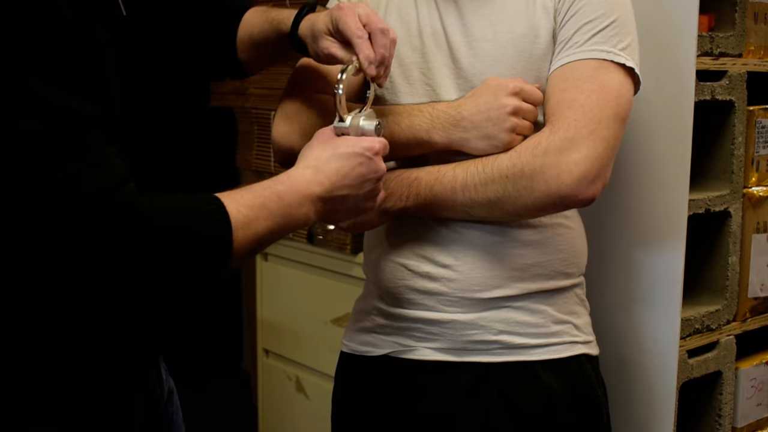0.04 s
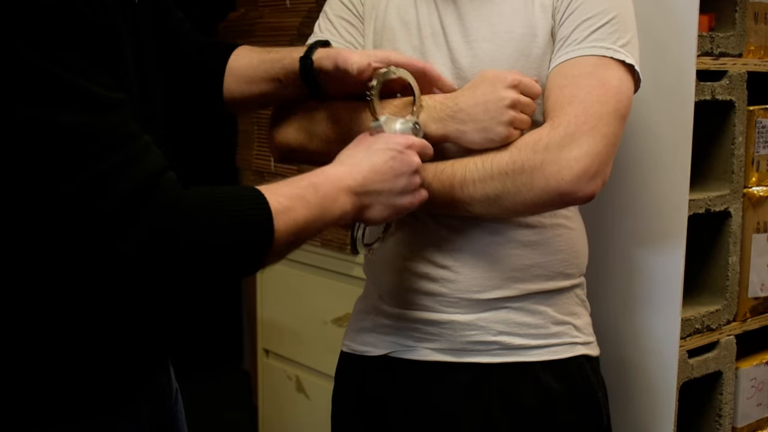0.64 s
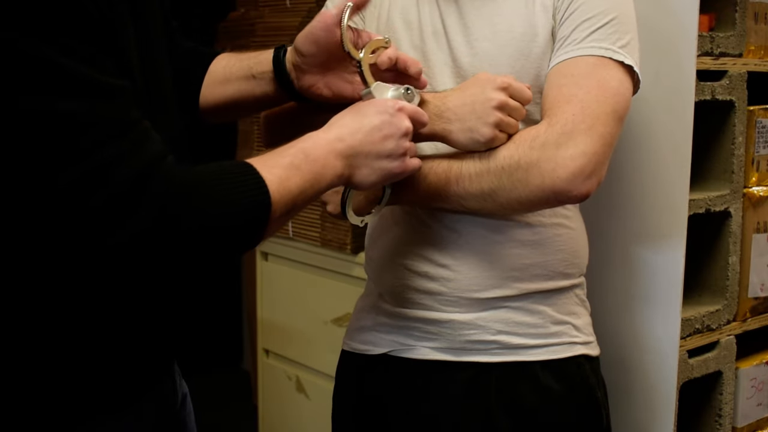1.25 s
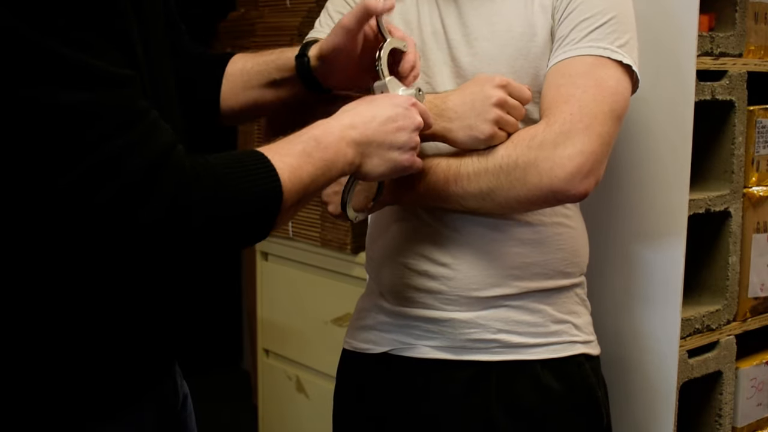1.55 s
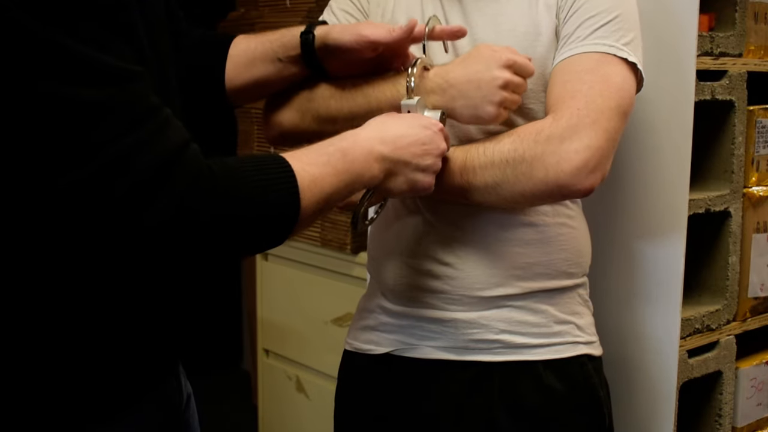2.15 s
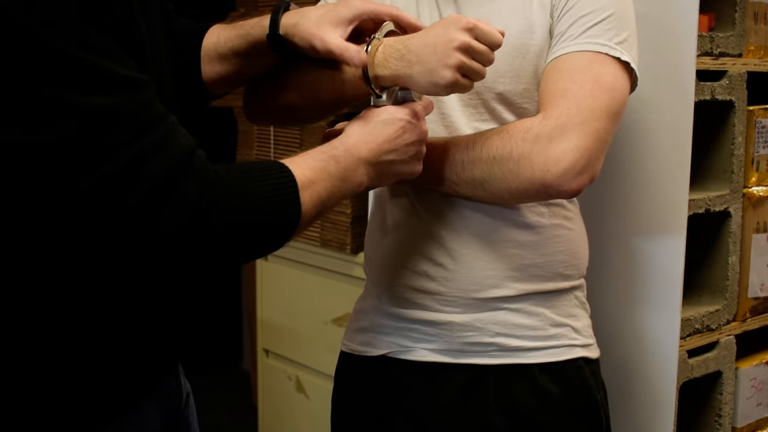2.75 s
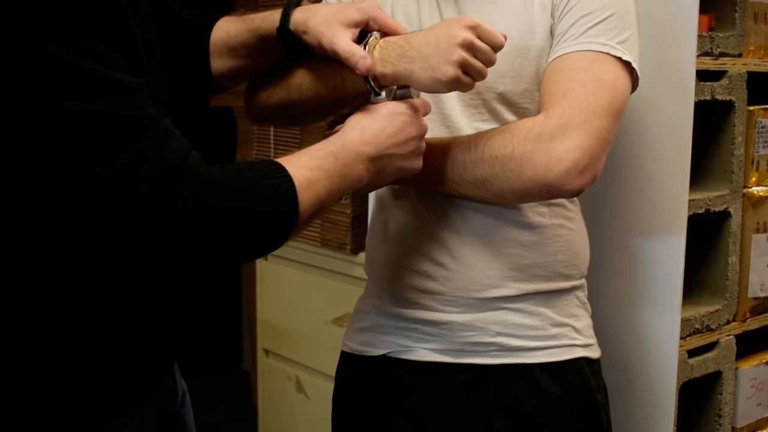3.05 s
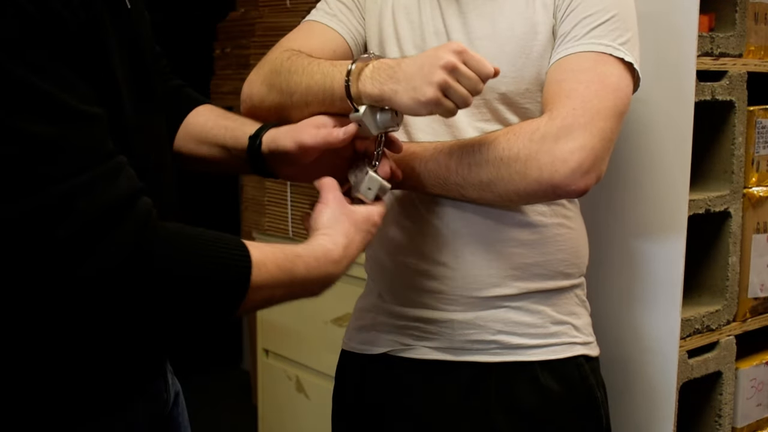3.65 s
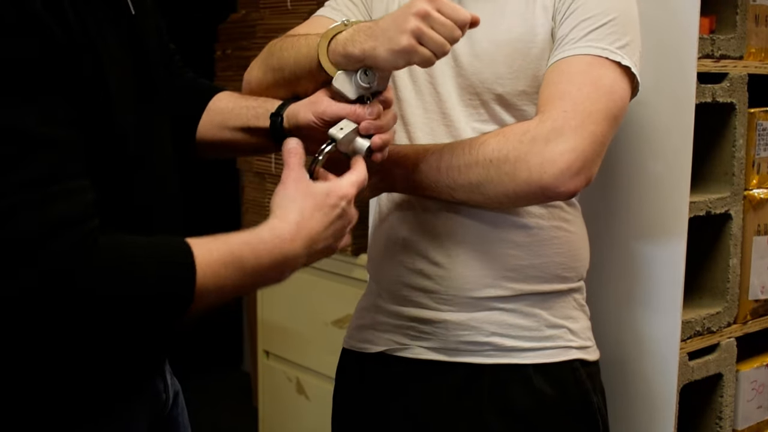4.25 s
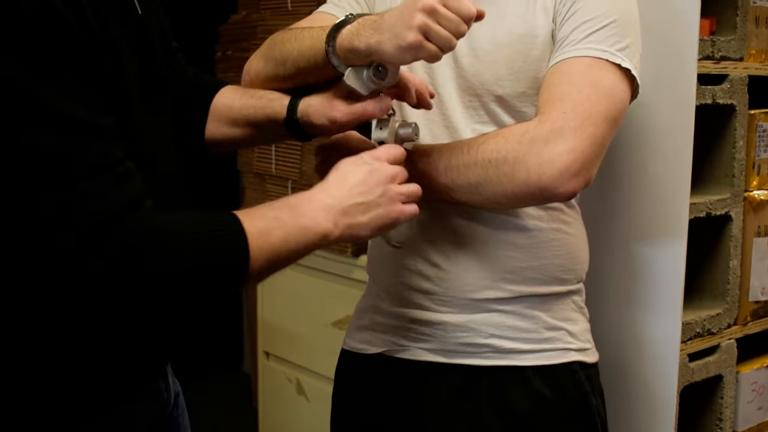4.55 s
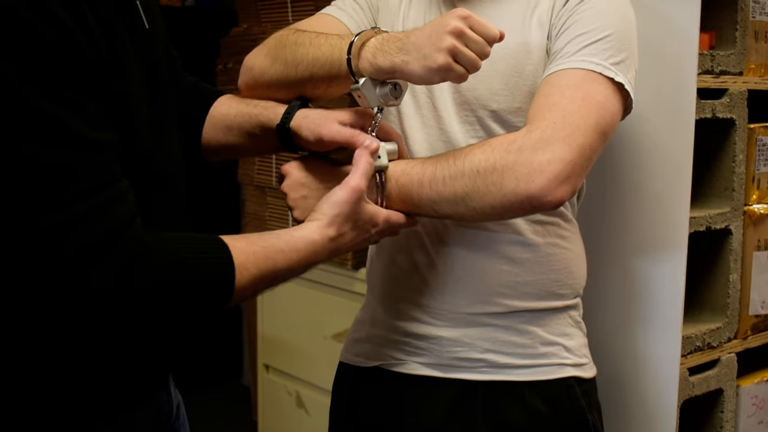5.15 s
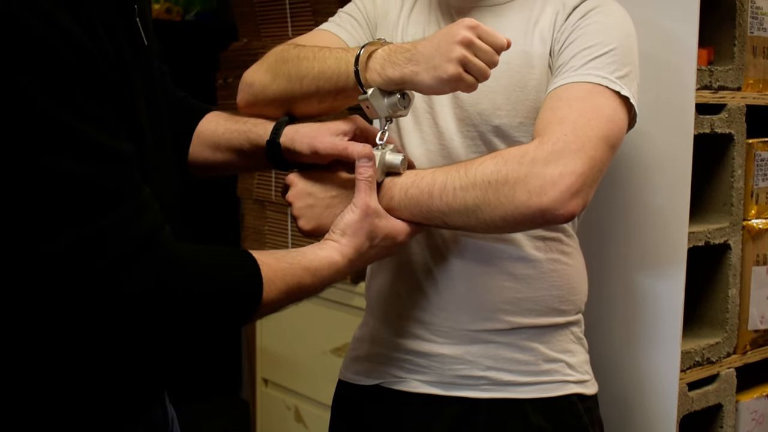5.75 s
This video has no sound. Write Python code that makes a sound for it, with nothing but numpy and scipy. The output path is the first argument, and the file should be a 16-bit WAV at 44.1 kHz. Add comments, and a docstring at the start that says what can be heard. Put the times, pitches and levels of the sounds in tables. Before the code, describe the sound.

Steel handcuffs clink and scrape, then ratchet shut in short, loud zips close by, over a faint electric room hum.

```python
"""Faint chain clinks come first, then loud zips as steel handcuffs close on a man's wrists.
Each zip is a small catch (the pawl) snapping over a row of teeth, loud enough to distort.
In between, links and curved cuff arms clink and scrape, and the open cuff rings on its chain.
A cuff knocks dully on the wrist, and sleeves and skin rustle. It all sounds close by,
in a small cluttered room with a faint electric hum."""
import sys
import numpy as np
from scipy import signal
from scipy.fft import rfft, irfft
from scipy.io import wavfile
from scipy.ndimage import uniform_filter1d, minimum_filter1d

SR = 44100
rng = np.random.default_rng(int(sys.argv[2]) if len(sys.argv) > 2 else 0)


def digitize_waveform(pressure):
    """Quantize a signal to 16-bit integers and store it at the path in sys.argv[1].

    Rows of a 2-D input are taken as channels; values are limited to [-1, 1].
    """
    field = np.atleast_2d(pressure).T
    bounded = np.clip(field, -1, 1)
    quanta = np.round(bounded * 32767).astype(np.int16)
    wavfile.write(sys.argv[1], SR, quanta)


N = 264644  # samples, about 6 seconds

# Pushes of the cuff arm through the ratchet. Pitch, body and edge are explained in steel_hit.
# start_s, length_s, tooth_count, level_db, level_change_db, pitch_hz, body_db, edge_db
RATCHET_RUNS = [(0.9201, 0.017, 6, -5, -2.5, 8840, -16, -9), (0.9918, 0, 1, -8.5, 0, 9000, -15.5, -14.5),
                (1.027, 0.022, 8, -5, 0.5, 8830, -14.5, -12.5), (2.7911, 0.018, 3, -6, -0.5, 8060, -9, -2),
                (2.8202, 0.011, 2, -22, 4.5, 9600, -11, -5), (2.908, 0.035, 9, -6.5, -1.5, 7400, -8, -1.5),
                (3.8882, 0.014, 8, -4, -7, 8040, -10.5, -5.5), (3.9343, .0072, 2, -7, -6, 7500, -9, -5),
                (5.7967, 0.0087, 2, -10, 5, 10460, -11.5, -5.5),
                (5.8357, 0.022, 6, -6, -1.5, 6370, -9.5, -2), (5.9401, 0, 1, -7.5, 0, 6880, -8.5, -3.5)]


def ratchet(pitch_spread=.08, push_curve=.87):
    """The pawl snaps over each tooth; the hand around the cuff stops the ring almost at once."""
    out = np.zeros(N)
    for start_s, length_s, teeth, db, change_db, hz, body_db, edge_db in RATCHET_RUNS:
        for progress in np.linspace(0, 1, teeth):
            pitch_hz = hz * (1 + pitch_spread * rng.standard_normal())
            snap = steel_hit(pitch_hz, body_db, edge_db, fade_s=.012, ring_db=-36, crack_db=-1)
            delay_s = length_s * progress ** push_curve  # a power under 1 makes the arm speed up
            add(out, start_s + delay_s, undb(db + change_db * progress) * snap)
    return out


# The tones a cuff rings with when struck: pitch_hz, level_db
STEEL_TONES = [(2090, -13.5), (2550, -2), (3060, 2), (3400, 0.5), (3860, 1.5), (4200, 2), (4480, -10),
               (4790, 1), (5430, -2.5), (5690, -1.5), (6200, 1), (6560, -1), (6900, 1.5), (7700, -7),
               (8000, 3.5), (8440, 0), (8710, -1.5), (9100, 1.5), (9670, 2.5), (10120, 0.5), (10500, 2),
               (10880, 2.5), (12080, 6), (12500, 1.5), (13050, -0.5), (13600, -3), (14200, -10)]
# The tone colour of the noisy crack of steel on steel: pitch_hz, level_db
CRACK_COLOUR = [(100, -30), (500, -19), (1200, 0.5), (2300, 6), (4000, -1), (8000, 2), (11000, -1),
                (13200, 3), (14500, -5), (16000, -4)]


def steel_hit(pitch_hz, body_db, edge_db, fade_s, ring_db, crack_db=-3, boost_db=10, samples=7000):
    """Steel hits steel: a crack, tones cut short by the grip, and a faint longer ring."""
    t = np.arange(samples) / SR
    # Body sets the low treble and edge the very high treble; the middle stays the same.
    colour = [(2000, min(2 * body_db + 3.5, body_db + 2)), (2900, body_db), (4000, body_db),
              (5000, -4), (8000, -3.5),
              (10500, .44 * edge_db - .5), (12600, edge_db), (16000, .47 * edge_db - 7)]

    def contact_gain(hz):
        """The spot that is struck favours the tones near pitch_hz."""
        nearness = np.exp(-((hz - pitch_hz) / 480) ** 2)
        return gain_at(hz, colour) * undb(boost_db * nearness)

    # The grip makes each tone a little different in pitch and strength at every hit.
    hz, db = np.transpose(STEEL_TONES)
    level_shift, pitch_shift, phase = rng.standard_normal((len(hz), 3)).T
    hz = hz * (1 + .01 * pitch_shift)
    gains = undb(db + 3.5 * level_shift) * contact_gain(hz)
    waves = np.sin(2 * np.pi * (np.outer(hz, t) + phase[:, None]))
    tones = gains @ waves / np.sqrt(np.sum(gains ** 2) / 2)
    crack = undb(crack_db) * noise(samples, lambda f: gain_at(f, CRACK_COLOUR) * contact_gain(f))
    ring = undb(ring_db) * tones * fade(t, .067)
    hit = (tones + crack) * fade(t, fade_s) + ring
    return hit / np.sqrt(np.mean(hit[:110] ** 2))  # the first 2.5 ms set the strength


# Links and cuff arms touching: start_s, level_db, pitch_hz, body_db, bounce_after_s (0 for none)
CHAIN_CLINKS = [(0.0397, -43, 4860, 21, 0), (0.0866, -44.5, 7060, 3, 0.016),
                (0.6982, -35, 5560, -4.5, 0.017), (1.0, -22, 9000, -10, .01),
                (1.1264, -28.5, 10870, -4, 0.0039), (1.1771, -37, 5430, 5, .004),
                (1.2336, -34, 5530, -18.5, 0), (1.2481, -31, 8800, -7.5, 0.00027),
                (1.4617, -34.5, 5400, -11.5, .0026), (1.5489, -28.5, 6200, -13, 0.017),
                (2.2685, -44, 6400, 2, 0.0088), (2.5332, -27, 7410, -3, 0),
                (2.5455, -21.5, 6693, -6, 0.025), (2.5981, -31, 4777, -1.5, 0.0013),
                (2.7324, -34.5, 5035, 12.5, 0.0007), (3.0854, -33, 7600, -4, 0.01),
                (3.3445, -42.5, 7010, 3.5, 0), (3.3995, -30.5, 7100, -6.5, 0.0033),
                (3.547, -37.5, 4700, -3, 0.0046), (3.58, -30.5, 5733, -0.5, 0),
                (3.6039, -28.5, 6900, -4.5, 0.0022), (3.6785, -23, 6180, -11, 0),
                (3.7256, -33.5, 10000, 4.5, 0.0011), (3.7674, -34.5, 7410, -4, 0.0043),
                (4.0769, -39, 6510, 7, 0), (4.15, -25.5, 9370, -3, 0.0016), (4.2604, -33, 7300, -1, 0),
                (4.3203, -31.5, 6400, -2.5, 0.00084), (4.3442, -20, 9600, -10, 0.0069),
                (4.4441, -37.5, 7467, -2.5, 0.0041), (4.4793, -30, 6384, -1, 0),
                (4.5305, -25.5, 6546, 4, 0), (4.5799, -30.5, 6713, -2.5, 0), (4.6462, -35.5, 6300, -11, 0),
                (4.7124, -40, 5960, 9, 0.0023), (4.8164, -35, 8896, -2, 0), (4.887, -28, 7550, -5.5, 0),
                (5.0082, -36, 6523, 1, 0.011), (5.269, -31, 5503, 0.5, 0.0083),
                (5.365, -41.5, 4500, 3, 0.0014), (5.388, -35, 9160, -5, 0.0012),
                (5.3974, -24.5, 10230, -9.5, 0.0071), (5.4221, -35, 5486, -10.5, 0.0017),
                (5.7858, -44, 7030, -3, 0.00037), (5.959, -22.5, 9000, -10, 0)]
# Times when the chain is moved about: start_s, end_s
CHAIN_MOVES = [(0.15, 0.45), (2.55, 2.66), (3.199, 3.8), (4.05, 5.28)]


def chain(finger_db=-3, ticks_per_s=6.5):
    """Links clink, bounce and tick; fingers soften their lower tones and soon stop the ring."""
    touches = []
    for start_s, db, hz, body_db, bounce_s in CHAIN_CLINKS:
        touches.append((start_s, db, hz, body_db))
        if bounce_s > 0:
            bounce_db = db - 2 - 300 * bounce_s  # a later bounce is weaker
            touches.append((start_s + bounce_s, bounce_db, hz, body_db))
    for start_s, end_s in CHAIN_MOVES:
        tick_count = round(ticks_per_s * (end_s - start_s))
        for tick_s in rng.uniform(start_s, end_s, tick_count):
            db, hz, body_db = rng.normal(-49, 2.5), rng.uniform(4510, 8500), 3
            touches.append((tick_s, db, hz, body_db))
    out = np.zeros(N)
    for start_s, db, hz, body_db in touches:
        edge_db = edge_level(hz, body_db)
        clink = steel_hit(hz, body_db + finger_db, edge_db, fade_s=.011, ring_db=-35, boost_db=11)
        add(out, start_s, undb(db) * clink)
    return out


def edge_level(pitch_hz, body_db):
    """Very high treble of a light touch, in dB: more if it is high-pitched, less if it is full."""
    return -17.5 + 6 * np.log2(pitch_hz / 6200) - .4 * body_db


# Steel sliding on steel: start_s, relative_level_db, length_s, pitch_hz, body_db
STEEL_SCRAPES = [(0.893, -40.5, 0.014, 7600, -5), (1.233, -41.5, 0.031, 4040, -2),
                 (1.545, -31, 0.034, 4350, -9.5), (1.583, -43, 0.049, 10200, -3.5),
                 (2.538, -32.5, 0.024, 7385, -5), (3.593, -43, 0.025, 6720, 6),
                 (3.762, -43, 0.035, 6940, 0), (4.128, -36.5, 0.042, 10500, -7),
                 (4.245, -39, .06, 7100, 0.5), (4.338, -37.5, 0.031, 7710, 6), (4.438, -40, 0.049, 6693, 1),
                 (4.874, -43, .037, 7300, 5.5)]


def scrapes(gain_db=-5, slips=7):
    """Sliding steel catches and lets go, making an uneven run of tiny hits."""
    out = np.zeros(N)
    for start_s, db, length_s, hz, body_db in STEEL_SCRAPES:
        for k, (lag, strength) in enumerate(rng.random((slips, 2))):
            slip = steel_hit(hz, body_db, edge_level(hz, body_db) + 3, fade_s=.013, ring_db=-26)
            delay_s = length_s * (k + lag) / slips
            add(out, start_s + delay_s, undb(db + gain_db) * (.5 + strength) * slip)
    return out


# Jolts of the open cuff on its chain: start_s, relative_level_db
CUFF_JOLTS = [(1.241, -41), (1.463, -46.5), (1.535, -38.5), (1.564, -36.5), (1.657, -53.5)]
# The tones of that freely hanging cuff: pitch_hz, relative_level_db, fade_s
HANGING_TONES = [(3340, -5.5, 0.12), (4350, 10.5, 0.05), (4440, -3.5, 0.08), (4930, -2, 0.12),
                 (6070, -6, 0.18), (7540, -8, 0.25), (8800, -19, .18), (10200, 1.5, 0.14),
                 (11100, -14, 0.15), (13400, 1, 0.12)]


def hanging_cuff(gain_db=-5, pitch_spread=.03):
    """No hand holds this cuff, so each jolt rings on, its tones shifted a little by the swing."""
    out, t = np.zeros(N), np.arange(14000) / SR
    for start_s, db in CUFF_JOLTS:
        for hz, tone_db, fade_s in HANGING_TONES:
            strength, phase, bend = rng.random(3)
            pitch_hz = hz * (1 + pitch_spread * (bend - .5))
            ring = np.sin(2 * np.pi * (pitch_hz * t + phase)) * fade(t, fade_s)
            add(out, start_s, undb(db + gain_db + tone_db) * (.5 + strength) * ring)
    return out


# The cuff bumping the wrist: start_s, relative_level_db
WRIST_KNOCKS = [(2.748, 1), (3.8894, -28.5)]
# The tones of a cuff pressed on the wrist: pitch_hz, relative_level_db, fade_s
WRIST_TONES = [(168, -16, 0.1), (316, -20.5, 0.048), (370, -25.5, 0.069), (547, -13, 0.026),
               (680, -21.5, 0.027), (1000, -29, 0.022)]


def wrist_knocks(band_hz=(110, 1400)):
    """Flesh cushions the blow, leaving low, short tones; a wrist is too small to give deep bass."""
    out, t = np.zeros(N), np.arange(9000) / SR
    tones = sum(undb(db) * np.sin(2 * np.pi * hz * t) * fade(t, fade_s)
                for hz, db, fade_s in WRIST_TONES)
    thud = signal.sosfilt(signal.butter(2, band_hz, "bandpass", fs=SR, output="sos"), tones)
    for start_s, db in WRIST_KNOCKS:
        add(out, start_s, undb(db) * thud)
    return out


# Sleeves and skin rubbing: start_s, level_db, length_s, pitch_hz
SLEEVE_RUBS = [(0.435, -57, 0.092, 625), (2.728, -35.5, 0.0097, 170.4), (2.948, -42, 0.042, 220),
               (2.977, -42, 0.027, 635), (3.147, -56, 0.35, 400), (3.604, -37, 0.034, 688),
               (3.887, -27.5, 0.0069, 900), (4.242, -44, 0.043, 557.6), (4.53, -42, 0.012, 870.7),
               (4.549, -47, 0.041, 259.2), (4.597, -56.5, 0.12, 600), (5.417, -43.5, 0.026, 380),
               (5.65, -53, 0.036, 580)]


def sleeve_rubs(roughness_db=4, samples=20000):
    """Cloth slips in small uneven steps; each rub swells quickly and dies away."""
    out, t = np.zeros(N), np.arange(samples) / SR
    for start_s, db, length_s, hz in SLEEVE_RUBS:
        colour = [(hz / 6, -18), (hz / 2, 0), (hz, 0), (hz * 3, -11), (hz * 16, -34)]
        hiss = noise(samples, lambda f: gain_at(f, colour))
        steps = unit(uniform_filter1d(rng.standard_normal(samples), 130))  # about 3 ms each
        rustle = unit(hiss * undb(roughness_db * steps))
        age = 3 * t / length_s
        swell = age * np.exp(1 - age)
        add(out, start_s, undb(db) * rustle * swell)
    return out


# Echoes off nearby walls and bodies: delay_s, level_db
NEAR_ECHOES = [(.0052, -19.5), (.0083, -27.5), (0.0093, -24.5), (0.0175, -40)]
# The tone colour of the sound that lingers in the room: pitch_hz, level_db
ROOM_COLOUR = [(100, -8), (600, -6), (1400, 3), (2500, 8), (6000, -2), (10000, -1), (13300, 4),
               (14500, 1.5), (16000, -9.5)]


def room(sound, tail_db=-8, early_fade_s=.11, late_db=-21, late_fade_s=.36, samples=16000, block=3000):
    """A cluttered room gives a few quick echoes and a short tail that dulls as it fades."""
    out, t = np.zeros(N), np.arange(samples) / SR
    build_up = 1 - np.exp(-(t / .005) ** 2)
    for start in range(0, N, block):  # the hands move, so each block gets a new tail
        early = noise(samples, lambda f: gain_at(f, ROOM_COLOUR))
        late = noise(samples, lambda f: gain_at(f, ROOM_COLOUR) / (1 + (f / 10000) ** 2))
        tail = (early * fade(t, early_fade_s) + undb(late_db) * late * fade(t, late_fade_s)) * build_up
        echoes = undb(tail_db) * tail / np.sqrt(np.sum(tail ** 2))
        for delay_s, db in NEAR_ECHOES:
            echoes[int(delay_s * SR)] += undb(db)
        add(out, start / SR, signal.fftconvolve(sound[start:start + block], echoes))
    return out


# The tones of the electric hum: pitch_hz, level_db
HUM_TONES = [(120, -69), (237, -69.5), (356, -68.5), (474, -71)]
# The tone colour of the room's soft rush: pitch_hz, relative_level_db
AIR_COLOUR = [(15, -48), (25, -8.5), (87, -11), (120, -2), (190, -8.5), (236, 0), (463, -7.5), (503, -9),
              (545, -7.5), (2220, -15), (4250, -17), (5570, -19.5), (6380, -19.5), (16000, -29.5)]


def hum_and_air(waver_radians=.18, waver_hz=4, air_db=-56):
    """An electric hum wavers over the soft rush of the room."""
    hum, t = np.zeros(N), np.arange(N) / SR
    for hz, db in HUM_TONES:
        drift = waver_radians * noise(N, lambda f: np.exp(-f / waver_hz))
        hum += np.sqrt(2) * undb(db) * np.sin(2 * np.pi * hz * t + drift)
    return hum + undb(air_db) * noise(N, lambda f: gain_at(f, AIR_COLOUR))


def undb(db):
    """Turn decibels into a number to multiply by."""
    return 10 ** (np.asarray(db) / 20)


def unit(sound):
    """Scale a sound to an average strength (rms) of 1."""
    return sound / np.sqrt(np.mean(sound ** 2))


def fade(t, fade_s):
    """A smooth fade that is 60 dB down after fade_s."""
    return np.exp(-np.log(1000) * t / fade_s)


def gain_at(hz, colour):
    """Read the gain at hz from a curve of (pitch_hz, level_db) points."""
    points_hz, db = np.transpose(colour)
    return undb(np.interp(np.log(hz + 1), np.log(points_hz), db))


def noise(samples, shape):
    """Noise of strength 1; shape(hz) says how much of each pitch it holds."""
    hz = np.fft.rfftfreq(samples, 1 / SR)
    return unit(irfft(rfft(rng.standard_normal(samples)) * shape(hz), samples))


def add(out, start_s, sound):
    """Mix a sound into out, beginning at start_s."""
    i = int(start_s * SR)
    out[i:i + len(sound)] += sound[:max(len(out) - i, 0)]


def scene(low_cut_hz=1500):
    """Steel, wrist and cloth sound together in the room, over the hum."""
    steel = ratchet() + chain() + scrapes() + hanging_cuff()
    # Small steel parts give off little low sound.
    steel = signal.sosfilt(signal.butter(2, low_cut_hz, "highpass", fs=SR, output="sos"), steel)
    near = steel + wrist_knocks() + sleeve_rubs()
    return (near + room(near) + hum_and_air())[None]


def record(dry, ceiling=1.25, window_samples=19, top_hz=16000):
    """A fast limiter turns loud snaps down, the remaining peaks clip, and the top treble is cut."""
    gain = ceiling / np.maximum(np.abs(dry), ceiling)
    held_gain = minimum_filter1d(gain, window_samples)
    smooth_gain = uniform_filter1d(held_gain, window_samples)
    clipped = np.clip(dry * smooth_gain, -1, 1)
    return signal.sosfiltfilt(signal.ellip(8, .1, 50, top_hz, fs=SR, output="sos"), clipped)


dry = scene()
out = record(dry)
digitize_waveform(out)
```